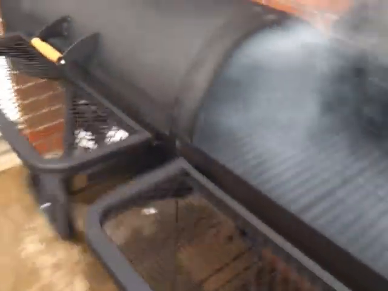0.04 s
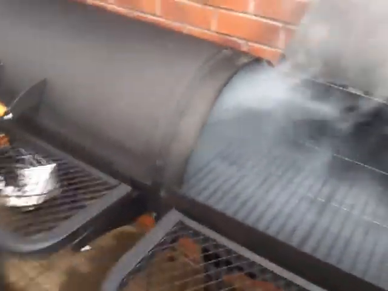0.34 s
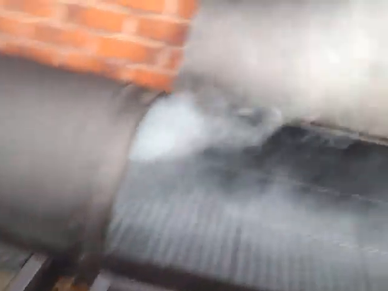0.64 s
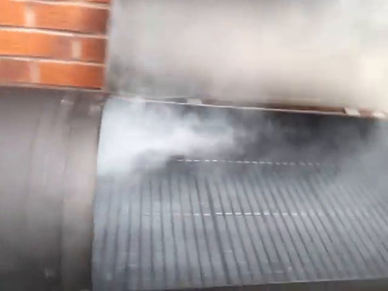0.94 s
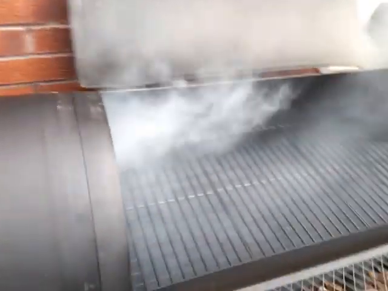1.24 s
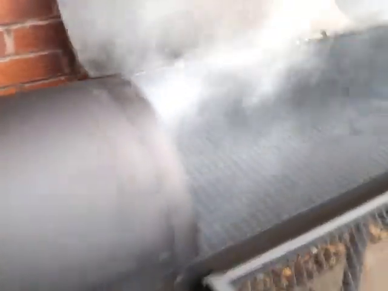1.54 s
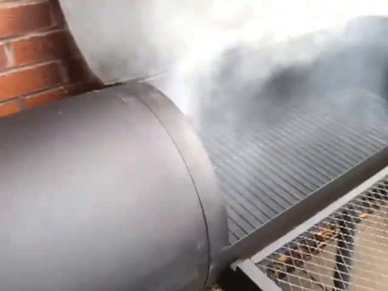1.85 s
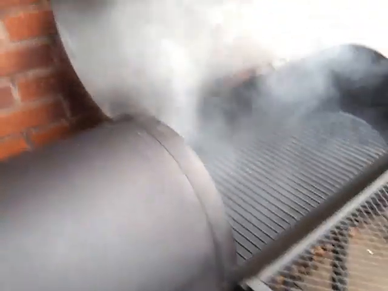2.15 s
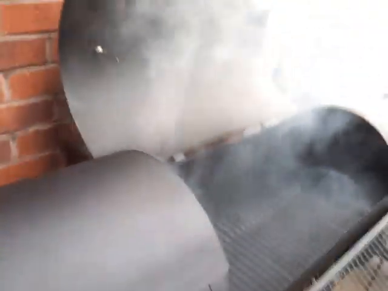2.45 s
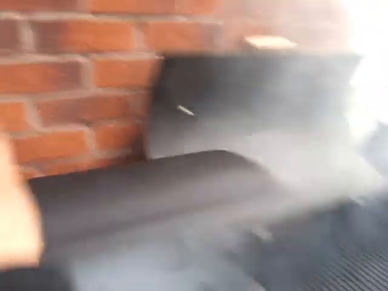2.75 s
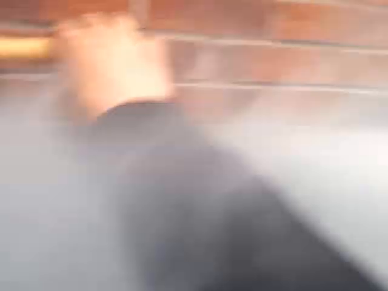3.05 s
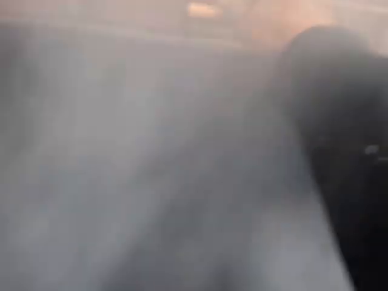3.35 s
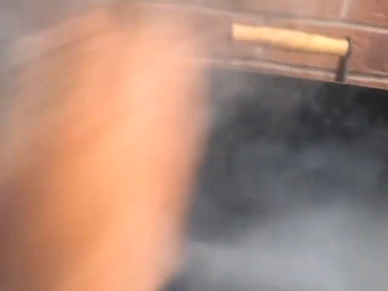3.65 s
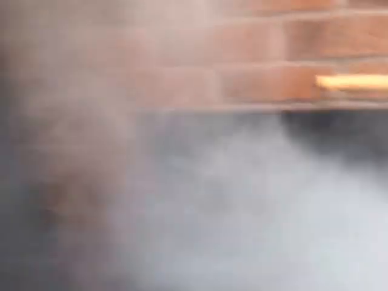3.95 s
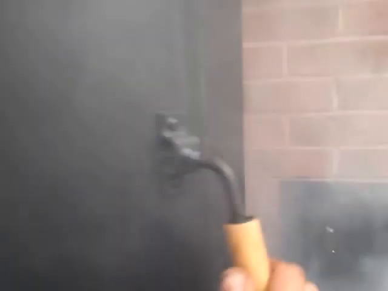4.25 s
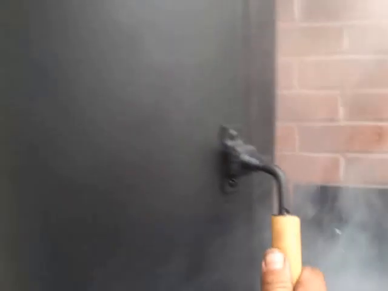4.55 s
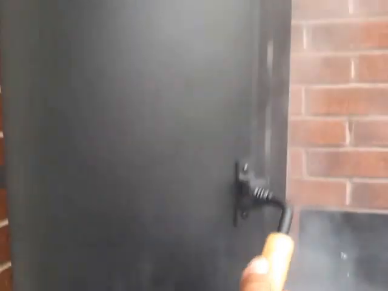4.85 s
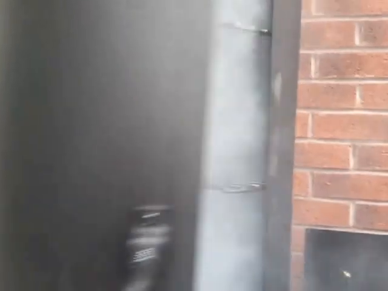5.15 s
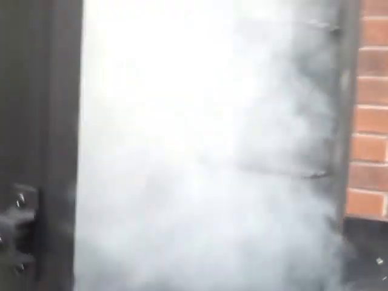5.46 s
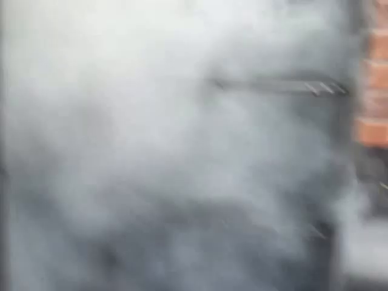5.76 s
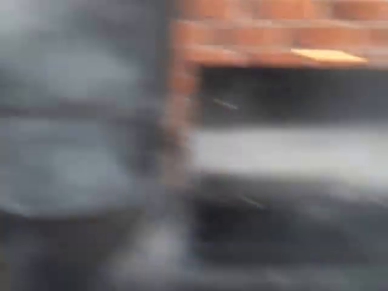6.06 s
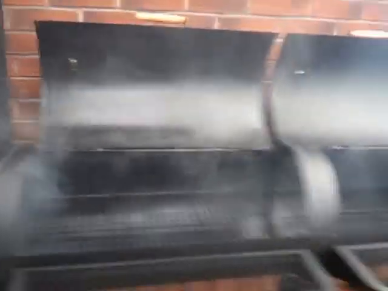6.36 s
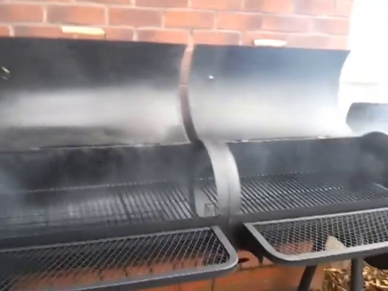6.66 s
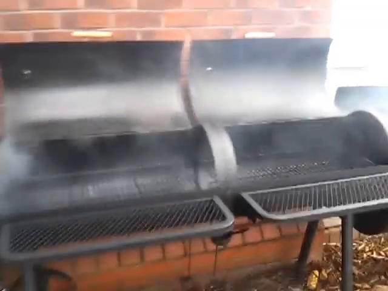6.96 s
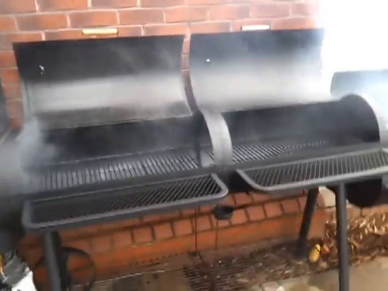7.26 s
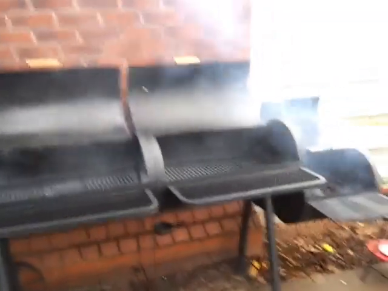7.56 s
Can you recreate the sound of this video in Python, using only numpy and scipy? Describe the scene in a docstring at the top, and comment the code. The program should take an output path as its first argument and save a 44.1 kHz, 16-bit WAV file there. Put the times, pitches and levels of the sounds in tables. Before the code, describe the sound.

Heavy steel lids of a barrel smoker thud and clang open outdoors, then a latch clacks and a steel door judders loudly free.

```python
"""A heavy steel barrel smoker is opened beside a brick wall, close to a small handheld microphone.
Over soft outdoor hiss come light scuffs and taps. One lid thuds open; hinges rub and squeak; a second
lid clangs and settles on its stop. Air puffs on the microphone. A latch clacks, the tall door judders
free, overloading the microphone, and hits its stop. Steel claps twice, and a few scuffs follow.
Each blow on steel is a contact crack, a wash of dense modes and the ring of the part's strong modes."""
import sys
import numpy as np
from scipy import signal
from scipy.fft import rfft, irfft, next_fast_len
from scipy.io import wavfile
from scipy.ndimage import map_coordinates

SR = 44100
rng = np.random.default_rng(int(sys.argv[2]) if len(sys.argv) > 2 else 0)


def waveform_to_disk(signal):
    """Save audio, clipped to [-1, 1], as 16-bit WAV at the path in sys.argv[1]."""
    frames = np.transpose(np.atleast_2d(signal))
    scaled = np.clip(frames, -1, 1) * 32767
    samples = np.round(scaled).astype(np.int16)
    wavfile.write(sys.argv[1], SR, samples)


N = 335820


def amp(db):
    """Decibels to gain."""
    return 10 ** (np.asarray(db) / 20)


def unit(x):
    """x at rms 1."""
    return x / np.sqrt(np.mean(x ** 2) + 1e-20)


def along(points, hz):
    """Interpolate (f/Hz, value) points on a log frequency axis."""
    point_hz, values = np.transpose(points)
    return np.interp(np.log(hz + 1), np.log(point_hz + 1), values)


def filtered(x, response):
    """Zero-phase filter with gain response(hz)."""
    size = next_fast_len(len(x) + SR // 10)
    return irfft(rfft(x, size) * response(np.fft.rfftfreq(size, 1 / SR) + 1), size)[:len(x)]


def noise(response, size=SR):
    """Coloured noise at rms 1."""
    return unit(filtered(rng.standard_normal(size), response))


def add(track, at_s, sound):
    """Mix sound into track at at_s."""
    start = max(round(at_s * SR), 0)
    track[start:start + len(sound)] += sound[:max(N - start, 0)]


def air():
    """Outdoor rumble, dull middle and hiss: one shared slow swell, separate flutter."""
    # background spectrum: f/Hz, density/dB
    colour = [(12, -35), (22, -0.5), (70, -6), (170, -5), (300, -8.5), (420, -14), (700, -15.5),
              (1200, -17), (2000, -17), (2700, -19.5), (3600, -20), (6200, -22.5), (8000, -25),
              (11000, -34), (14000, -89)]
    # hiss contour, highest as the second lid opens: t/s, level/dB
    contour = [(0.0, -49.5), (0.54, -49.5), (1.17, -53), (1.6, -53.5), (1.71, -50.5), (2.45, -42),
               (2.53, -46.5), (3.13, -47), (4.55, -51.5)]
    t = np.arange(N) / SR
    hiss_db = np.interp(t, *np.transpose(contour))
    swell_db = hiss_db - hiss_db.mean()
    rumble_db, middle_db = -50 + 0.21 * swell_db, -48.5 + 0.53 * swell_db
    flutter_hz, flutter_db = 14, 1.75
    out = np.zeros(N)
    for db, low_hz, high_hz in [(rumble_db, 20, 590), (middle_db, 330, 2240),
                                (hiss_db - 0.95, 3500, 20000)]:
        skirts = lambda hz: np.sqrt((1 + (low_hz / hz) ** 6) * (1 + (hz / high_hz) ** 6))
        band = noise(lambda hz: amp(along(colour, hz)) / skirts(hz), size=N)
        flutter = map_coordinates(rng.standard_normal(128), [t * flutter_hz])
        out += band * amp(db + flutter_db * flutter)
    return out


def grit(events, gain_db, t60_s):
    """Decaying bursts of grainy noise with a faint ring of steel mesh."""
    # mesh spectrum: f/Hz, density/dB
    mesh = [(200, -12), (1200, -1), (1750, -2), (2050, 0.5), (2600, -10), (3600, -1.5), (4600, -4),
            (5000, -1.5), (5400, -5), (6800, -5.5), (8500, -11.5), (11000, -18), (14000, -60)]
    out, t = np.zeros(N), np.arange(SR) / SR
    grid_hz = np.arange(0, SR / 2, 40)
    onset = 1 - np.exp(-t / 0.001)
    for at_s, db, tilt_db_oct in events:
        ripple_db = 4 * rng.standard_normal(len(grid_hz))
        grains = rng.standard_normal(SR)
        grains *= amp(3 * rng.standard_normal(SR // 100 + 1)).repeat(100)[:SR]
        shape_db = ripple_db + tilt_db_oct * np.log2(np.clip(grid_hz, 500, 6000) / 1000)
        ring = filtered(grains, lambda hz: amp(along(mesh, hz) + np.interp(hz, grid_hz, shape_db)))
        add(out, at_s, amp(db + gain_db - 60 * t / t60_s) * onset * unit(ring))
    return out


def scuffs_and_ticks():
    """Light scuffs on the mesh and short dry ticks."""
    # contacts, both tables: t/s, level/dB, tilt/(dB/oct)
    scuffs = [(0.0024, -30.5, -2.3), (0.1474, -39.5, 0.5), (0.2864, -24, 1.8), (0.4912, -34, -0.3),
              (0.7718, -35.5, 0.8), (4.0699, -33, -2.2), (4.3079, -32.5, -4.7), (6.2244, -37, 6.5),
              (7.0185, -37, -0.5), (7.1225, -35.5, -0.5), (7.479, -35, 4)]
    ticks = [(0.597, -35, 4.4), (4.023, -29, 6.6), (6.3243, -29.5, 1.9)]
    return grit(scuffs, gain_db=-7, t60_s=0.48) + grit(ticks, gain_db=-5, t60_s=0.042)


def swells(events):
    """Band noise of friction or air under Gaussian envelopes centred on the event times."""
    out, t = np.zeros(N), np.arange(SR) / SR - .5
    for at_s, db, centre_hz, width_oct, sigma_s in events:
        band = noise(lambda hz: 1 / (1 + (np.log2(hz / centre_hz) / width_oct) ** 2) ** 1.6)
        envelope = np.exp(-.5 * (t / sigma_s) ** 2)
        swell = amp(db) * unit(band * envelope) * np.sqrt(np.mean(envelope ** 2))
        skip = max(round((.5 - at_s) * SR), 0)
        add(out, at_s - .5, swell[skip:])
    return out


def handling_taps():
    """Soft, dull taps of handling."""
    # taps: t/s, level/dB
    taps = [(.26, -39), (1.551, -31.5), (1.608, -38)]
    centre_hz, width_oct, sigma_s = 308, 0.32, 0.0031
    return swells([(at_s, db, centre_hz, width_oct, sigma_s) for at_s, db in taps])


def rattle(blows, gap_s=.02, widen=1.5, loss_db=3, dulling_db_oct=0):
    """A loose part rebounds at widening gaps, each time weaker; negative dulling brightens."""
    rebound_rise_s = 0.003
    delays_s = np.cumsum(gap_s * widen ** np.arange(8))
    contacts = []
    for at_s, db, tilt_db_oct, rise_s, rattle_s in blows:
        contacts.append((at_s, db, tilt_db_oct, rise_s))
        for k, delay_s in enumerate(delays_s[delays_s < rattle_s], 1):
            contacts.append((at_s + delay_s, db - k * loss_db,
                             tilt_db_oct - k * dulling_db_oct, rebound_rise_s))
    return contacts


def steel(contacts, modes, colour, *, wash_t60_s, damping_exp, ring_db, ring_t60_s,
          frame_db, frame_t60_s, crack_db, ripple_db):
    """Struck steel: crack, dense wash dying treble first, strong modes. t60 settings apply at 1 kHz."""
    out, t = np.zeros(N), np.arange(SR) / SR
    mode_hz, mode_db, mode_t60_s = np.transpose(modes)
    # plate damping caps each mode's decay time
    life_s = np.clip(mode_t60_s, .05, ring_t60_s * np.sqrt(1000 / mode_hz))
    decay = amp(mode_db[:, None] - 60 * t / life_s[:, None])
    # crowded upper modes keep their places from blow to blow
    grid_hz = np.arange(0, SR / 2, 14)
    crowd_db = ripple_db * np.clip(rng.standard_normal(len(grid_hz)), -2, 1.8)
    crowd_db *= np.clip(grid_hz / 1500, 0, 1)
    end_fade = np.minimum(10 * (1 - t), 1)
    for at_s, db, tilt_db_oct, rise_s in contacts:
        hardness = lambda hz: amp(tilt_db_oct * np.log2(np.clip(hz, 120, 6000) / 1000))
        wash = noise(lambda hz: amp(along(colour, hz) + np.interp(hz, grid_hz, crowd_db)) * hardness(hz))
        crack = noise(lambda hz: amp(along(colour, hz)) * hardness(hz) * hz ** 0.31)
        crack *= amp(crack_db - 60 * t / 0.063)
        # plates radiate fast; the welded frame lingers, far weaker
        bin_hz, slice_s, spectrum = signal.stft(wash, SR, nperseg=256)
        age_s = slice_s * (np.maximum(bin_hz, 200)[:, None] / 1000) ** damping_exp
        wash_decay = amp(-60 * age_s / wash_t60_s) + amp(frame_db - 60 * age_s / frame_t60_s)
        wash = signal.istft(spectrum * wash_decay, SR, nperseg=256)[1][:SR]
        phase = rng.uniform(0, 2 * np.pi, len(modes))
        weights = unit(hardness(mode_hz)) * amp(rng.normal(0, 1.5, len(modes)))
        weights /= np.linalg.norm(amp(mode_db))
        # the part is held differently at each contact: slight detuning
        detuned_hz = mode_hz * (1 + rng.normal(0, .003, len(modes)))
        ring = weights @ (decay * np.sin(2 * np.pi * detuned_hz[:, None] * t + phase[:, None]))
        onset = 1 - np.exp(-t / max(rise_s, 1e-4))
        add(out, at_s, amp(db) * onset * end_fade * (crack + wash + amp(ring_db) * ring))
    return out


def first_lid():
    """The first lid thuds open and rattles."""
    # blows: t/s, level/dB, tilt/(dB/oct), rise/s, rattle/s
    blows = [(1.548, -42, 3.5, .0002, 0), (1.636, -24, 0.3, 0.0007, .07), (1.812, -33, 2, 0.0057, 0),
             (1.905, -33.5, 3.5, .0003, 0)]
    # strong modes: f/Hz, level/dB, t60/s
    modes = [(111, -2, 0.24), (147.5, 2, 0.26), (218.5, 0.5, 0.57), (316, -10.5, 0.43), (920, -17, 0.71),
             (1230, -26, 0.44), (1340, -29, .25), (1740, -18, 0.51), (2180, -26, 0.4), (3830, -12.5, 0.12)]
    # dense modes: f/Hz, density/dB
    colour = [(50, -36), (85, -25), (125, -3), (215, -3.5), (420, -11.5), (900, -14), (1400, -19),
              (2200, -23.5), (2900, -32), (4100, -28), (4800, -41.5), (7200, -38.5), (10000, -48),
              (13000, -85.5)]
    contacts = rattle(blows, gap_s=0.02, widen=1.0, loss_db=2.25)
    return steel(contacts, modes, colour, wash_t60_s=0.28, damping_exp=0.018, ring_db=5,
                 ring_t60_s=0.81, frame_db=-15.5, frame_t60_s=2.0, crack_db=-10, ripple_db=6)


def hinges():
    """Friction: broad rubs, narrow squeaks, a falling scrape as the second lid's hinge takes load."""
    # rubs of hinges, handle and sleeve: t/s, level/dB, f/Hz, width/oct, sigma/s
    rubs = [(1.922, -35, 1260, 0.97, 0.0093), (2.39, -42.5, 156, 0.16, 0.13),
            (3.6, -51.5, 5600, 0.45, 0.33), (4.64, -40, 1680, 1.6, 0.035), (4.765, -33.5, 240, 3.1, 0.026),
            (4.92, -38, 225, 1.7, 0.088), (4.99, -31, 1260, 2.7, 0.043), (5.63, -45.5, 4800, 0.6, 0.073),
            (7.19, -44.5, 1380, .9, .012), (7.34, -47.5, 4470, 0.66, .064)]
    # hinge squeaks: t/s, level/dB, f/Hz, sigma/s
    squeaks = [(1.915, -31.5, 3500, 0.0058), (2.322, -36, 1110, 0.018), (2.464, -46.5, 4500, 0.097),
               (2.463, -47.5, 6370, 0.1), (4.941, -35.5, 570, .025)]
    squeak_oct = 0.058
    squeal = [(at_s, db, hz, squeak_oct, sigma_s) for at_s, db, hz, sigma_s in squeaks]
    start_s, span_s, from_hz, to_hz = 2.262, .062, 3800, 1020
    slip_db, slip_oct, slip_sigma_s = -38, 0.61, 0.019
    scrape = [(start_s + u * span_s, slip_db, from_hz * (to_hz / from_hz) ** u, slip_oct, slip_sigma_s)
              for u in np.linspace(0, 1, 4)]
    return swells(rubs) + swells(squeal) + swells(scrape)


def second_lid():
    """The second lid clangs loose."""
    # blows: t/s, level/dB, tilt/(dB/oct), rise/s, rattle/s
    blows = [(2.298, -34.5, 0.5, 0.0036, .02), (2.708, -19.5, -0.53, 0.00089, .075),
             (2.953, -41, 4, 0.0044, 0)]
    # strong modes: f/Hz, level/dB, t60/s
    modes = [(111.7, -4, 1.1), (187, -35, 2.5), (282, 6.5, 0.27), (396.5, -4.5, 2.3), (467, -11, 1.2),
             (551, -17, 0.88), (722, -5.5, 1), (890, -13, 0.29), (970, 0, 0.41), (985, -36, 1.4),
             (1028, -21, 0.81), (1207, -4, 0.59), (1380, -8, 0.44), (1400, -20, 0.57), (1497, -25, 1),
             (1850, -15, 0.26)]
    # dense modes: f/Hz, density/dB
    colour = [(35, -51), (60, -23), (107, -7.5), (144, -10), (203, -2), (246, -15), (292, -1), (479, -13),
              (949, -12.5), (1100, -15.5), (4160, -21), (6660, -36), (10000, -49), (13000, -101),
              (22000, -120)]
    contacts = rattle(blows, gap_s=.011, widen=1.7, loss_db=2, dulling_db_oct=0.09)
    return steel(contacts, modes, colour, wash_t60_s=0.24, damping_exp=0.053, ring_db=-2.5,
                 ring_t60_s=0.92, frame_db=-15, frame_t60_s=3.1, crack_db=-20, ripple_db=4)


def lid_stop():
    """The second lid bounces and settles on its stop."""
    # blow: t/s, level/dB, tilt/(dB/oct), rise/s, rattle/s
    blows = [(3.183, -27, 0, 0.0077, .18)]
    # strong modes: f/Hz, level/dB, t60/s
    modes = [(103, 0.5, 1), (158, -4, 3.0), (198, -7, 2.1), (301, -1.5, 0.97), (498, 5, 0.16),
             (713, 1.5, 0.2), (880, -12, 0.78), (945, -25, 0.91), (1160, -9, 1.7), (1400, -21, 0.74)]
    # dense modes: f/Hz, density/dB
    colour = [(29, -52), (50, -23), (92, 1), (133, -16), (361, -0.5), (459, -12), (724, -14), (919, -17.5),
              (1450, -16), (6220, -31), (9000, -37), (11700, -87), (19800, -120)]
    contacts = rattle(blows, gap_s=.021, widen=1.45, loss_db=1.5, dulling_db_oct=-0.32)
    return steel(contacts, modes, colour, wash_t60_s=0.23, damping_exp=0.27, ring_db=-1,
                 ring_t60_s=0.82, frame_db=-13.5, frame_t60_s=2.3, crack_db=-16, ripple_db=3.5)


def air_puffs():
    """Low puffs of air on the microphone."""
    # puffs: t/s, level/dB, f/Hz
    puffs = [(3.661, -37.5, 60), (4.069, -29.5, 66), (4.118, -30.5, 145), (4.189, -35, 108),
             (6.224, -32, 91.5), (6.279, -35, 89)]
    width_oct, sigma_s = 1.2, 0.019
    return swells([(at_s, db, hz, width_oct, sigma_s) for at_s, db, hz in puffs])


def latch():
    """The latch clacks; its tongue then snaps past the keeper."""
    # blow: t/s, level/dB, tilt/(dB/oct), rise/s, rattle/s
    blows = [(4.662, -16.5, 0.92, 0.00099, .11)]
    # strong modes: f/Hz, level/dB, t60/s
    modes = [(936, -7, 0.51), (990, -13, .3), (1050, -1, 0.45), (1480, -5.5, 0.46), (1780, -5, 0.43),
             (2260, -1.5, 0.25), (2400, -12, .9), (4010, -4, 0.2), (4350, -14, 0.51), (4830, -14, .3),
             (5539, -6, .25), (5700, -8, 0.22), (5850, -13, 0.24), (6350, -10, 0.23)]
    # dense modes: f/Hz, density/dB
    colour = [(240, -50), (400, -34), (870, -14), (1040, -10), (1370, -22), (1430, -19), (1760, -9),
              (2950, -19), (4050, -13.5), (4990, -15.5), (5730, -10), (8000, -17.5), (9060, -20.5),
              (9980, -22), (11000, -82), (14300, -110), (22000, -120)]
    # tongue resonances before sharpening: f/Hz, width/Hz, level/dB
    tongue = [(990, 61, -2), (1150, 160, -6.5), (1350, 170, -6), (1770, 170, -6), (1990, 110, -6.5),
              (3970, 350, -10), (6400, 1100, -10.5)]
    contacts = rattle(blows, gap_s=.036, widen=2.3, loss_db=10, dulling_db_oct=0.94)
    out = steel(contacts, modes, colour, wash_t60_s=0.38, damping_exp=0.34, ring_db=-0.5,
                ring_t60_s=1.0, frame_db=-20.5, frame_t60_s=2.2, crack_db=-0.5, ripple_db=2.5)
    t = np.arange(SR) / SR
    peaks = lambda hz: sum(amp(db) * hz * width_hz / np.abs(peak_hz ** 2 - hz ** 2 + 1j * hz * width_hz)
                           for peak_hz, width_hz, db in tongue)
    snap = noise(lambda hz: peaks(hz) ** 2.4)  # exponent sharpens the peaks
    decay = amp(-14 - 60 * t / 0.024) + amp(-23 - 60 * t / 0.25)
    add(out, 4.951, snap * decay)
    return out


def door():
    """The door judders out of its frame; the whole sheet flexes and booms."""
    # blows: t/s, level/dB, tilt/(dB/oct), rise/s, rattle/s
    blows = [(5.008, -27, -3.5, 0.0019, 0), (5.018, -12.5, -6.5, .0008, 0.011),
             (5.024, -4.5, 1.35, 0.0043, 0.16), (5.197, -4, 5.5, .0002, 0.04)]
    # strong modes: f/Hz, level/dB, t60/s
    modes = [(207.3, 3, 0.56), (255.6, 7.5, 0.53), (404, -15.5, 3.3), (508, -8.5, 2.78), (555, 5.5, 0.57),
             (600, -24, 3.7), (651.4, -13, 1.6), (700, -6.5, 1.5), (752, 3.5, .7), (890, -10.5, 0.49),
             (926, 3, 0.74), (1010, -13, 2.7), (1063, -11.5, 1.7), (1070, 1, 0.59), (1175, 1, 1.01),
             (1240, -12, 1.4), (1400, -8, 1.3), (1493, -8, 3.6), (1523, -7, 0.98), (1520, -23, 0.43),
             (1644, -3, 0.76), (1915, -9, 1.9), (1980, -2.5, .6), (2040, -10, 0.47), (2250, -3.5, 0.44),
             (2190, -6, 0.31), (2620, -9, 0.31), (2725, 3, 0.18), (5370, -6, 0.57), (6960, -14, 0.27)]
    # dense modes: f/Hz, density/dB
    colour = [(29, -33), (50, -33), (103, -20.5), (151, -21), (254, -7.5), (427, -8), (535, -5),
              (821, -6.5), (1150, -1.5), (1350, -9), (1690, -4.5), (3110, -11), (5590, -12.5), (6700, -15),
              (11000, -24.5), (14300, -71), (22000, -120)]
    # sheet flexure: f/Hz, level/dB, t60/s
    flex_modes = [(108, -37, 0.27), (121.7, -7.5, 0.34), (149, -11.5, 0.17), (177.6, -21, 0.36)]
    contacts = rattle(blows, gap_s=.019, widen=1.13, loss_db=0.73, dulling_db_oct=0.22)
    out = steel(contacts, modes, colour, wash_t60_s=0.44, damping_exp=0.47, ring_db=-6.5,
                ring_t60_s=1.6, frame_db=-19.5, frame_t60_s=1.83, crack_db=-25, ripple_db=4)
    t = np.arange(SR) / SR
    boom = sum(amp(db - 60 * t / t60_s) * np.sin(2 * np.pi * hz * t) for hz, db, t60_s in flex_modes)
    onset = 1 - np.exp(-t / 0.0018)
    add(out, 5.016, onset * boom)
    return out


def door_stop():
    """The door hits its stop and rebounds."""
    # blow: t/s, level/dB, tilt/(dB/oct), rise/s, rattle/s
    blows = [(5.849, -20, 0.71, 0.00068, .17)]
    # strong modes: f/Hz, level/dB, t60/s
    modes = [(380, -13.5, 1.4), (658.5, -2, 0.4), (733, -5, 0.96), (805, -23, 0.32), (920, -15, 1.4),
             (1020, -16, 0.54), (1076, -14, 0.78), (1260, -17, 1), (1470, -14, 0.53), (1570, -25, 0.18),
             (1771, -13, 0.57), (2090, -27, 0.87)]
    # dense modes: f/Hz, density/dB
    colour = [(71, -52), (120, -24), (155, -3.5), (184, -18.5), (320, -4.5), (351, -8), (392, 0),
              (589, -10), (659, -7.5), (1380, -15.5), (1600, -12.5), (1890, -20.5), (5850, -37),
              (10000, -50), (13000, -91), (22000, -120)]
    contacts = rattle(blows, gap_s=.016, widen=1.6, loss_db=5.5, dulling_db_oct=-2.4)
    return steel(contacts, modes, colour, wash_t60_s=0.24, damping_exp=0.15, ring_db=-2.5,
                 ring_t60_s=0.71, frame_db=-14, frame_t60_s=2.1, crack_db=4, ripple_db=4)


def claps():
    """Steel drops hard on steel and bounces once."""
    # blows: t/s, level/dB, tilt/(dB/oct), rise/s, rattle/s
    blows = [(6.617, -9, 0.77, 0.0001, 0), (6.747, -16, 0.18, 0.00023, 0)]
    # strong modes: f/Hz, level/dB, t60/s
    modes = [(205.5, 3.5, 0.49), (566, -14, 2.1), (658, -16, 1.3), (1150, 1, 0.16), (1314, -19, 1.6),
             (1410, -14.5, 1.1), (1610, -27, .6), (1860, -19, .35), (2040, -17, .2), (2160, -12, 0.33),
             (2520, -14, 0.66), (2530, -5, 0.19), (3280, -13, .25), (3510, -3, .3), (4090, -6, 0.34),
             (4220, -5, 0.27)]
    # dense modes: f/Hz, density/dB
    colour = [(65, -61), (110, -48), (200, -11.5), (262, -10), (741, -12), (848, -14.5), (1510, -8.5),
              (1830, -7), (2860, -11.5), (3810, -9.5), (4990, -18.5), (6540, -18.5), (8080, -25.5),
              (9430, -25.5), (11000, -81), (14300, -107), (22000, -120)]
    return steel(rattle(blows), modes, colour, wash_t60_s=0.12, damping_exp=0.37, ring_db=-6.5,
                 ring_t60_s=1.8, frame_db=-14, frame_t60_s=0.94, crack_db=1.5, ripple_db=4)


def scene():
    """Mono sum at the microphone."""
    scuffs = scuffs_and_ticks()
    impacts = first_lid() + second_lid() + lid_stop() + latch() + door() + door_stop() + claps()
    return (scuffs + impacts + hinges() + handling_taps() + air_puffs() + air())[None]


def record(dry):
    """The microphone saturates on the loudest blows and passes little treble; full scale clips."""
    # microphone response: f/Hz, gain/dB
    response = [(20, 2), (70, 0.5), (6800, 1), (7400, -8), (7900, -21), (8800, -11.5), (9700, -16.5),
                (10600, -34.5), (15500, -36.5)]
    ceiling, cutoff_hz = .84, 15800
    saturated = dry[0] / (1 + np.abs(dry[0] / ceiling) ** 6) ** (1 / 6)
    coloured = filtered(saturated, lambda hz: amp(along(response, hz)))
    clipped = np.clip(coloured, -1, 1)
    return filtered(clipped, lambda hz: hz < cutoff_hz)[None]


dry = scene()
out = record(dry)
waveform_to_disk(out)
```